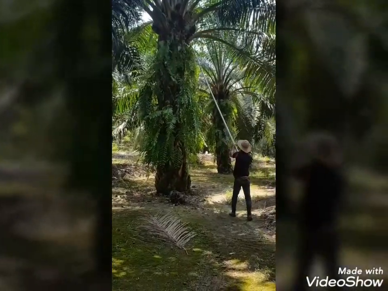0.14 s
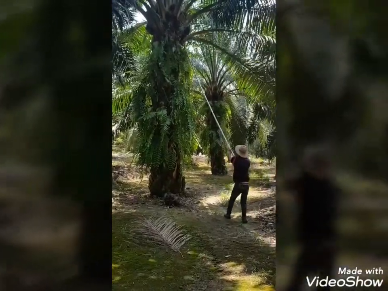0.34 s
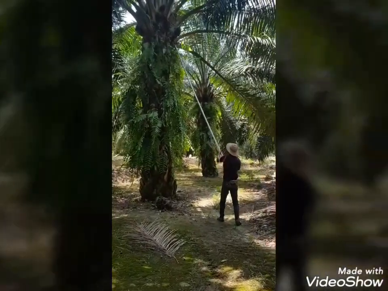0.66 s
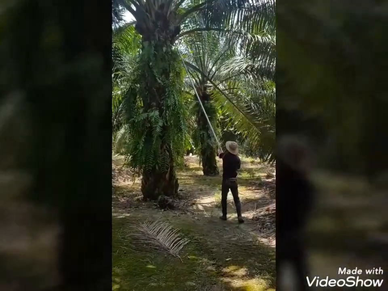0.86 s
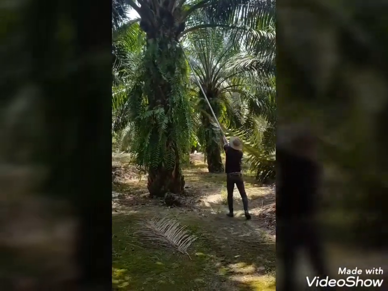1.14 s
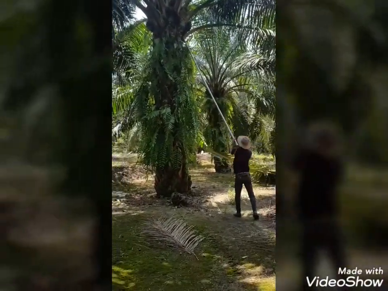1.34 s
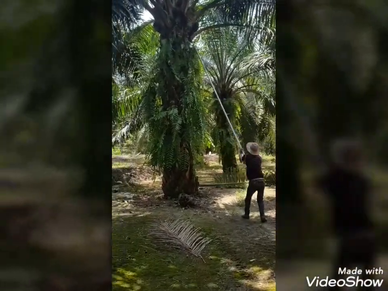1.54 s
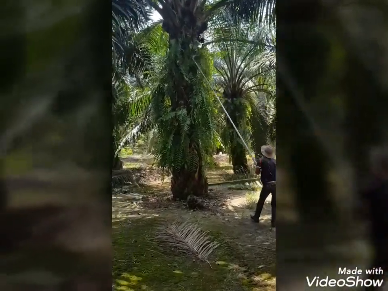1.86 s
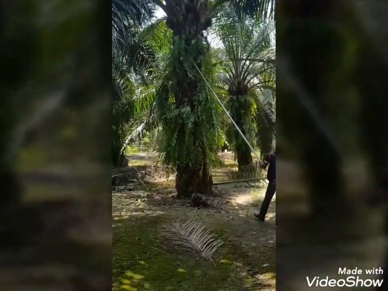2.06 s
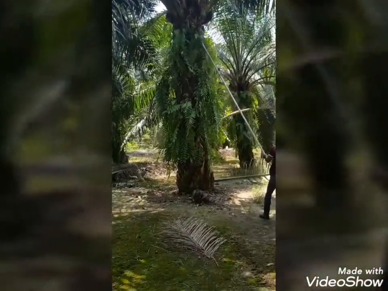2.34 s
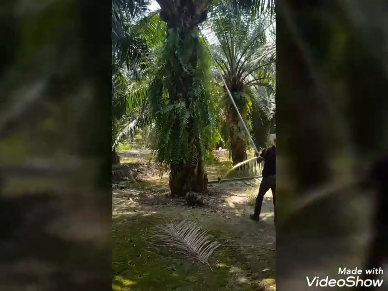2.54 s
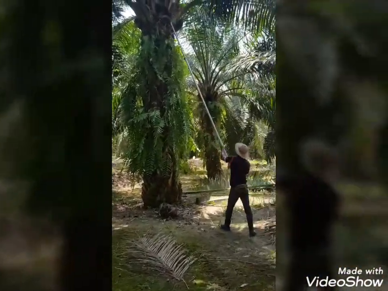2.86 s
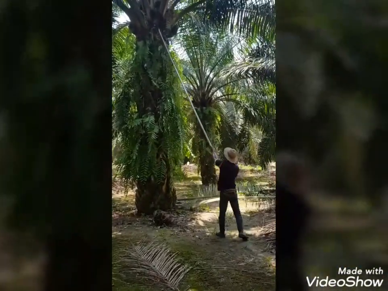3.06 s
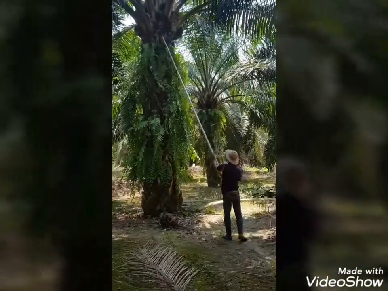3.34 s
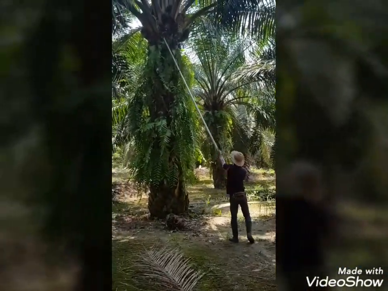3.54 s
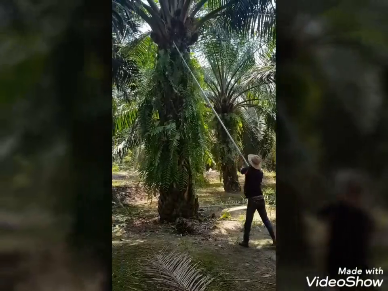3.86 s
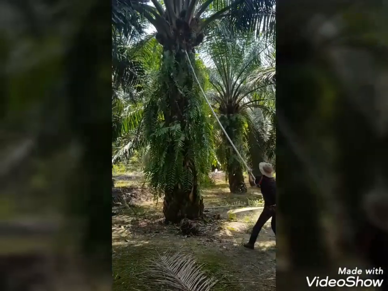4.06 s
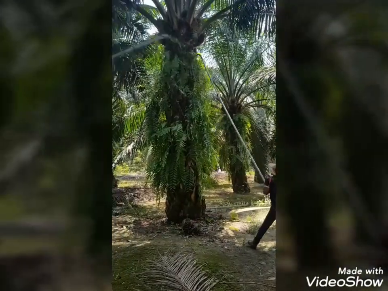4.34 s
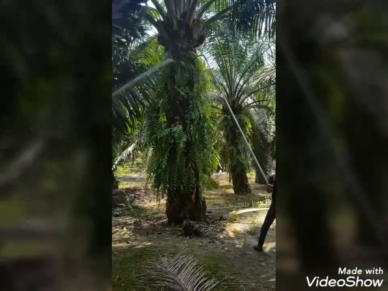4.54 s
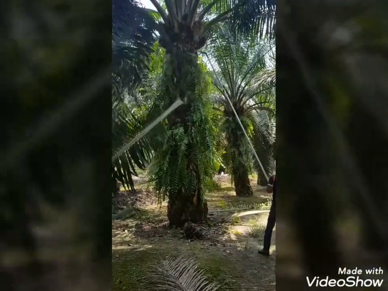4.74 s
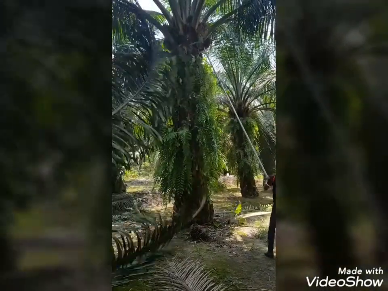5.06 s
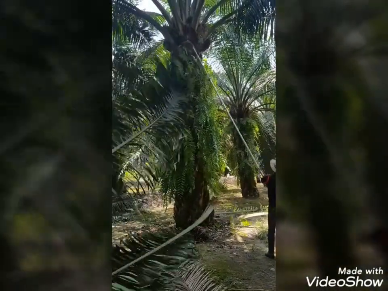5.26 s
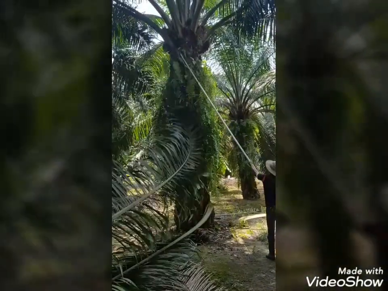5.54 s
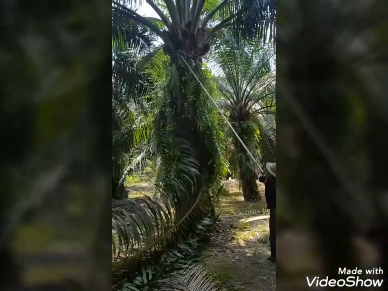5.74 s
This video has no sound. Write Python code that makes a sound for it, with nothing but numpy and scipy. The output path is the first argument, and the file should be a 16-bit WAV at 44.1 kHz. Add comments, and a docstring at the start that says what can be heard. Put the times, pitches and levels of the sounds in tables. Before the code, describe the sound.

Outdoors, a soft low hush and a faint distant engine drone lie under dry palm fronds. From 0 to 0.8 s come light rustles, small ticks and hollow woody knocks, strongest near 0.5 s. Rustling swells from 1.1 s; dull stalk blows at 1.5 and 1.7 s come with a soft thud and a broad leafy swish, fading by 2.4 s. A few ticks and another low thud near 2.7 s lead into a brighter, drier drag until 3.3 s. The engine hum, climbing slightly, peaks around 3.3 s, drops and is gone by 4.1 s. After a near lull, the loudest moment strikes at 4.1 s: a sharp crack, crunch and brief steel ring. Rustle and creaking continue, then heavy crunches, knocks, a thud and crashing leaves at 5.2 to 5.4 s, and a last jerk at 5.9 s. Close stereo, with a short thin tail.

```python
"""Dry palm fronds rustle and tick at once, over a small engine's distant drone and an outdoor hush.
A long-pole blade is cutting them: thick stalks crunch and knock, fibres snap, soft thuds reach the ground.
Coloured ticks and hiss make the leaves; slips and blows ring the modes of stalk and steel; two sines make
the engine. Two microphones a hand apart hear the fronds move from side to side."""
import sys
import numpy as np
from scipy import signal
from scipy.fft import rfft, irfft, next_fast_len
from scipy.io import wavfile
from scipy.ndimage import uniform_filter1d

SR = 44100
rng = np.random.default_rng(int(sys.argv[2]) if len(sys.argv) > 2 else 0)


def transcribe(signal):
    """Save signal, clipped to [-1, 1], as a 16-bit WAV file at the path in sys.argv[1]."""
    frames = np.atleast_2d(signal).T
    limited = np.clip(frames, -1, 1)
    pcm = np.round(limited * 32767).astype(np.int16)
    wavfile.write(sys.argv[1], SR, pcm)


N = 260190  # length in samples

# modes a frond stalk rings with, four of the butt first: (pitch_hz, relative_level_db, t60_s)
STALK_MODES = [(156, -10.5, 0.073), (215, -1.5, 0.024), (276.6, -2.5, 0.028), (349.5, 1, 0.019),
               (446.6, 4.5, 0.013), (821, 8, 0.01), (960, 10, 0.0089), (1160, 12.5, 0.005),
               (1310, 6.5, 0.0053)]
# which part of the frond moves, a gliding curve before chance shifts it:
# (time_s, dullness 0-1 from dry tips to broad blades, weight on the stalk's butt 0-1)
MOVING_PART = [(0.0, 0.43, 0.3), (0.9, 0.28, 0.18), (1.45, 0.47, 0.86), (1.66, 0.28, 0.27),
               (1.9, .35, 0.48), (2.6, 0.4, 0.4), (2.77, 0.54, 0.13), (2.95, 0.28, 0.55), (3.9, 0.37, 0.35),
               (4.12, 0.17, .2), (4.5, 0.64, 0.3), (5.1, .45, 0.38), (5.3, .6, 0.49), (5.9, 0.42, 0.22)]


def gain_of(db):
    """Decibels to amplitude."""
    return 10 ** (np.asarray(db) / 20)


def evened(x):
    """Scales to rms 1."""
    return x / np.sqrt(np.mean(x ** 2) + 1e-20)


def curve(rows, t):
    """All columns of a table, joined by straight lines at times t."""
    s, *columns = np.transpose(rows)
    return [np.interp(t, s, column) for column in columns]


def read(points, hz):
    """A spectrum read on a log-frequency axis."""
    f, value = np.transpose(points)
    return np.interp(np.log(hz + 1), np.log(f + 1), value)


def filtered(x, points):
    """Gives each frequency the gain in dB of the table."""
    size = next_fast_len(N)
    gain = gain_of(read(points, np.fft.rfftfreq(size, 1 / SR)))
    return irfft(rfft(x, size) * gain, size)[:, :N]


def coloured(x, points):
    """Filters x by the spectrum of the table, then scales it to rms 1."""
    return evened(filtered(x, points))


def clicks(per_s, spread_db):
    """Two unrelated trains of ticks of random sign and uneven size."""
    size_db = spread_db * np.minimum(rng.exponential(1, (2, N)), 5)
    sign = rng.choice([-1., 1.], (2, N))
    return gain_of(size_db) * sign * (rng.random((2, N)) < per_s / SR)


def flutter(ms):
    """Slow chance of rms 1: noise smoothed twice over a window of ms."""
    width = round(ms * SR / 1000)
    return evened(uniform_filter1d(uniform_filter1d(rng.standard_normal(N), width), width))


def ring(hz, t60):
    """One dying mode; it takes a moment to start."""
    t = np.arange(4096) / SR
    return (1 - np.exp(-t / 0.0016)) * gain_of(-60 * t / t60) * np.sin(2 * np.pi * hz * t)


def ringing(modes):
    """All modes of an object struck once, energy 1; a slim thing radiates no deep bass."""
    body = sum(gain_of(db) * ring(hz, t60) for hz, db, t60 in modes)
    body = signal.sosfilt(signal.butter(4, 140, "high", fs=SR, output="sos"), body)
    return body / np.linalg.norm(body)


def struck(x, response):
    """Lets both channels of x excite one response."""
    return signal.oaconvolve(x, response[None], axes=1)[:, :N]


def trunks(x):
    """Trunks and crowns scatter a short, thin tail."""
    t = np.arange(8192) / SR
    tail = rng.standard_normal((2, 8192)) * gain_of(-60 * t / 0.25) * (t > .006)
    return x + gain_of(-6.0) * signal.oaconvolve(x, tail / np.linalg.norm(tail[0]), axes=1)[:, :N]


def pair(x, scatter):
    """The right microphone hears the left's sound shifted in time, blended with unrelated scattered sound."""
    # left-right likeness at scatter 1: (pitch_hz, likeness 0-1)
    likeness = [(30, 0.48), (80, 0.92), (250, 0.87), (500, 0.78), (1000, 0.41), (2000, 0.11), (4000, 0.15),
                (12000, 0.064)]
    # how late the sound reaches the left, a gliding curve: (time_s, lag_samples)
    left_lag = [(0, -7.5), (.75, -3), (1.1, 0), (1.75, 3), (2.25, 8.5), (3.25, 3), (3.7, -7.5), (4.4, -6),
                (4.7, 10.5), (5.9, 11.5)]
    # side-to-side balance, a gliding curve: (time_s, left_minus_right_db)
    balance = [(0.0, 0.2), (0.9, -0.7), (3.4, 0), (3.88, -2.5), (4.0, 0.5), (5.9, -0.3)]
    hz, t, z = signal.stft(x, SR, nperseg=1024, noverlap=768)
    same = np.clip(read(likeness, hz), 0, 1)[:, None] ** scatter
    ahead = np.exp(2j * np.pi * hz[:, None] * curve(left_lag, t)[0] / SR)
    z[1] = same * ahead * z[0] + np.sqrt(1 - same ** 2) * z[1]
    z *= gain_of(np.array([.5, -.5])[:, None, None] * curve(balance, t)[0])
    return signal.istft(z, SR, nperseg=1024, noverlap=768)[1][:, :N]


def hush():
    """Far traffic, breeze and insects blend into one bed of coloured noise with a slight flutter."""
    # spectrum of the bed: (pitch_hz, relative_level_db per Hz)
    bed = [(20, -17), (45, -3), (75, 3.5), (150, 2), (250, -8.5), (400, -16.5), (800, -16), (1500, -22),
           (3000, -28), (8000, -21.5), (13000, -32), (15800, -50)]
    level_db = -50.5 + 1.1 * flutter(ms=38)
    return gain_of(level_db) * coloured(rng.standard_normal((2, N)), bed)


def engine(t):
    """Only the firing tone and its octave carry; both throb, and fade as the throttle closes."""
    # the distant engine, gliding curves: (time_s, firing_rate_hz, firing_rms_db, octave_rms_db)
    running = [(0.0, 72, -63, -40), (0.27, 75.44, -53, -62), (0.33, 74.85, -54, -54),
               (0.64, 75.47, -57, -48), (1.16, 77, -50.5, -50.5), (1.3, 78.86, -45.5, -55),
               (1.86, 81, -49, -52), (2.1, 82, -44, -51), (2.45, 83.9, -42.5, -54),
               (2.62, 85.2, -46.5, -55.5), (2.7, 86.5, -44.5, -52), (2.8, 85.5, -52.5, -58),
               (3.32, 89.2, -40.5, -47.5), (3.57, 88.4, -43.5, -62), (3.72, 76.2, -52, -65),
               (3.9, 75, -50, -59), (4.1, 74, -63, -66)]
    hz, first_db, second_db = curve(running, t)
    turn = 2 * np.pi * np.cumsum(hz * (1 + 0.0088 * flutter(ms=34))) / SR
    first = gain_of(first_db + 1.5 * flutter(ms=25)) * np.sin(turn)
    second = gain_of(second_db + 1.5 * flutter(ms=20)) * np.sin(2 * turn)
    fade = np.clip((4.1 - t) / 0.23, 0, 1)
    return np.sqrt(2) * (first + second) * fade  # root 2 turns rms into peak


def thuds(t):
    """Soft ground takes a weight: a few low cycles that swell and fade."""
    # footfalls and landings: (centre_s, level_db, pitch_hz)
    landings = [(0.471, -51, 61), (1.69, -39, 60), (2.72, -38, 47.7), (5.3, -41, 69.3)]
    return sum(gain_of(db) * np.exp(-((t - s) / 0.018) ** 2) * np.sin(2 * np.pi * hz * (t - s))
               for s, db, hz in landings)


def effort(t):
    """Rustle and crunch in dB: slow sway plus jolts that rise fast, hold, and die sooner in wood than leaves."""
    # how hard the fronds sway and drag, gliding curves: (time_s, rustle_db, crunch_above_rustle_db)
    sway = [(0.0, -41.5, -6), (0.38, -48.5, -5), (0.62, -45, -5), (0.79, -44, -0.5), (0.85, -49, -12),
            (0.98, -49, -5.5), (1.13, -36, -10), (1.28, -34.5, -12), (1.54, -37.5, -7), (1.76, -29.5, -7.5),
            (2.2, -38.5, -9.5), (2.36, -43, -7.5), (2.65, -46, -7), (2.78, -33.5, -11), (2.91, -28, -11),
            (3.09, -31.5, -13), (3.17, -30, -7), (3.29, -31, -11), (3.38, -43, -11), (3.58, -50.5, -4.5),
            (4.03, -58, -2), (4.09, -25, -0.5), (4.2, -28.5, -5), (4.37, -34, -3.5), (4.5, -33.5, -3.5),
            (4.57, -37.5, -6), (4.78, -38, -5.5), (4.9, -28.5, -3), (5.04, -30, -7), (5.11, -32.5, -11),
            (5.32, -23.5, 1), (5.39, -21.5, -5.5), (5.52, -32.5, -8.5), (5.9, -29.5, -7.5)]
    # sudden jerks of a frond, full_s being when each reaches its full strength:
    # (full_s, rustle_db, crunch_db, rise_db_per_s, held_s)
    jolts = [(0.0, -34.5, -39.5, 1100, 0.0023), (0.113, -42, -39, 3000, 0.0049),
             (0.248, -42, -59, 4000, 0.011), (0.44, -57, -36, 400, 0.013), (0.459, -36, -36, 500, 0.013),
             (0.542, -34.5, -31, 1500, 0.015), (0.797, -62, -41.5, 800, 0.0034),
             (1.48, -58, -33, 500, 0.016), (1.677, -30, -24, 600, .012), (1.711, -33, -27, 800, 0.013),
             (2.392, -48, -47, 800, .008), (2.526, -39, -42.5, 3000, .004), (2.735, -39, -36, 1500, 0.042),
             (3.632, -38, -37.5, 353, 0.007), (4.078, -34, -28.5, 503, 0.076),
             (4.147, -22.5, -23.5, 800, 0.0072), (5.185, -49, -24, 600, 0.05),
             (5.265, -36, -26, 600, 0.018), (5.315, -23.5, -23.5, 500, 0.015),
             (5.548, -50, -37, 600, 0.0047), (5.877, -20.5, -28.5, 500, .03)]
    rustle_db, above_db = curve(sway, t)
    power = gain_of([rustle_db, rustle_db + above_db]) ** 2
    fall_db_per_s = np.array([[201], [400]])  # leaves, wood
    for full_s, leaf_db, wood_db, rise, held in jolts:
        under_db = rise * np.maximum(full_s - t, 0) + fall_db_per_s * np.maximum(t - full_s - held, 0)
        power += gain_of(np.array([[leaf_db], [wood_db]]) - under_db) ** 2
    return 10 * np.log10(power)


def clumps(per_s, ms):
    """Bunches of leaves catch suddenly and slide free slowly: a level in dB of rms 1."""
    catches = rng.exponential(1, N) * (rng.random(N) < per_s / SR)
    level = signal.lfilter([1], [1, -np.exp(-1000 / (ms * SR))], catches)
    return evened(level - level.mean())


def leaves(colour):
    """Thousands of leaf edges tick past each other, in small clumps, over their blended hiss."""
    edges = evened(clicks(per_s=4000, spread_db=1.0)) + 0.75 * rng.standard_normal((2, N))
    level_db = 0.57 * clumps(per_s=130, ms=5.1) + 0.48 * clumps(per_s=45, ms=5.8)
    return gain_of(level_db) * coloured(edges, colour)


def slaps():
    """Single leaflets slap flat against others: sparse pops of a few cycles, each size with its own pitch."""
    t = np.arange(256) / SR
    total = np.zeros((2, N))
    for hz in np.geomspace(1000, 7000, 12):
        pop = np.sin(2 * np.pi * hz * t) * t * hz * np.exp(-t * hz / 1.1)
        total += struck(clicks(per_s=40, spread_db=4), pop)
    return evened(total)


def leaflets(t, rustle_db):
    """Dry tips and broad blades rustle apart and share the power; slaps ride on top."""
    # spectrum of the dry tips: (pitch_hz, relative_level_db per Hz)
    tips = [(350, -27), (700, -33), (1500, 1), (2800, -1), (4500, 2), (6500, -1), (10000, -3),
            (13200, -8.5), (15800, -31)]
    # spectrum of the broad leaf blades: (pitch_hz, relative_level_db per Hz)
    blades = [(350, -24.5), (700, -2.5), (1000, -10.5), (1600, -5.5), (2450, -1), (4000, -4), (7000, -10.5),
              (12800, -14.5), (15800, -26.5)]
    # dullness also shifts by chance as the frond turns
    dull = np.clip(curve(MOVING_PART, t)[0] + 0.16 * flutter(ms=63), 0, 1)
    rustle = np.sqrt(dull) * leaves(blades) + np.sqrt(1 - dull) * leaves(tips)
    return gain_of(rustle_db) * (rustle + gain_of(-13) * slaps())


def stalks(t, crunch_db):
    """Rubbing and bending send uneven slips into the wood; more weight wakes the low modes of the thick butt."""
    # weight also shifts by chance as the frond turns
    weight = np.clip(curve(MOVING_PART, t)[1] + 0.1 * flutter(ms=34), 0, 1)
    slips = clicks(per_s=900, spread_db=-0.5)
    butt_modes, shaft_modes = np.split(np.array(STALK_MODES), [4])
    butt = evened(struck(slips, ringing(butt_modes)))
    shaft = evened(struck(slips, ringing(shaft_modes)))
    crunch = np.sqrt(weight) * butt + np.sqrt(1 - weight) * shaft
    return gain_of(crunch_db + 2.0 * flutter(ms=18)) * crunch


def ticks():
    """Dry ribs and spines break: a burst with an instant start and a broad colour around its brightest pitch."""
    # sharp breaks: (start_s, peak_db, brightest_hz)
    breaks = [(0.112, -37, 2510), (0.247, -29, 5000), (0.328, -40, 2000), (0.542, -30, 1600),
              (1.845, -26, 2000), (2.525, -26, 4000), (2.69, -29, 1500), (4.052, -40, 1500),
              (4.152, -10, 5500)]
    out, t = np.zeros((2, N + 1024)), np.arange(1024) / SR
    for s, peak_db, hz in breaks:
        band = signal.butter(1, [hz / 2, min(2 * hz, SR / 3)], "band", fs=SR, output="sos")
        burst = rng.standard_normal((2, 1024)) * np.exp(-t / 0.0025)
        tick = signal.sosfilt(band, burst)
        out[:, round(s * SR):][:, :1024] += gain_of(peak_db) * tick / abs(tick).max(1, keepdims=True)
    return out[:, :N]


def blade(t):
    """The steel is shaken for a few milliseconds at each bite and rings on."""
    # modes of blade and pole: (pitch_hz, relative_level_db, t60_s)
    steel = [(1283, 3, 0.11), (1950, -7, 0.038), (2060, 2, 0.053), (2406, 6, 0.19), (3320, -13, .06),
             (4370, -5, .05)]
    # the blade jerks in the wood: (start_s, shake_level_db)
    bites = [(3.172, -36), (4.082, -32), (4.1, -22), (4.147, -19.5), (5.186, -24), (5.322, -25)]
    shakes = sum(gain_of(db) * np.exp(-np.maximum(t - s, 0) / 0.0074) * (t > s) for s, db in bites)
    return struck(shakes * rng.standard_normal((2, N)), ringing(steel))


def knocks():
    """At each blow the struck spot swings a few cycles, the shaken stalk answers, and fibre snaps."""
    # single blows: (start_s, spot_and_stalk_level_db, spot_pitch_hz, fibre_snap_db, length_s)
    hits = [(0.11, -35, 806, -36, 0.0037), (0.246, -36.5, 764, -41, .0025), (0.326, -44, 1670, -43, 0.0032),
            (0.439, -30, 760, -40, .0036), (0.467, -29, 260, -36, .0038), (0.54, -23.5, 762, -40, .0044),
            (0.554, -24.5, 282, -50, .003), (0.641, -37, 715, -44, .002), (0.707, -34, 746, -40, 0.0025),
            (0.747, -39, 950, -43, .0044), (0.799, -34, 720, -44, .0038), (1.144, -30, 192, -46, 0.0021),
            (1.457, -29, 199, -55, .0027), (1.476, -28, 250, -60, 0.0025), (1.486, -18, 723, -61, 0.0018),
            (1.508, -26, 202, -54, .0021), (1.672, -23.5, 1477, -33, .005), (1.682, -22, 189, -43, 0.0035),
            (1.712, -22.5, 1115, -33, 0.0042), (1.726, -23, 936, -41, 0.0019),
            (1.843, -30.5, 885, -33, 0.0029), (2.39, -36.5, 490, -44, 0.0029),
            (2.523, -31, 2640, -40, .002), (2.689, -34.5, 770, -39, 0.0018), (2.752, -28, 758, -35, 0.0042),
            (3.169, -34, 2090, -25, 0.0033), (3.637, -32, 490, -45, 0.0018), (4.05, -46, 820, -39, .003),
            (4.081, -23, 248, -30, 0.0036), (4.084, -18, 774, -30, 0.0032), (4.144, -20, 208, -32, 0.0041),
            (4.147, -8, 1183, -16.5, .0025), (4.46, -33.5, 855, -30.5, 0.0031),
            (4.822, -34, 259, -42, 0.0034), (5.183, -22, 380, -23, 0.0025), (5.211, -18, 480, -22, .0023),
            (5.22, -17, 690, -34, .0025), (5.267, -27, 940, -25, .0032), (5.321, -19.5, 380, -23, 0.0018),
            (5.357, -21, 213, -27, 0.0027), (5.407, -21.5, 263, -26, 0.0018),
            (5.877, -24, 960, -29, 0.0028)]
    # spectrum of splitting fibre: (pitch_hz, relative_level_db per Hz)
    fibre_colour = [(300, -30), (800, -9), (1500, 1), (2400, 5.5), (4000, -23), (9000, -5.5), (15000, -35)]
    stalk_share = 0.3  # of the whole stalk ringing at a blow, 0-1
    out, t = np.zeros((2, N + 8192)), np.arange(2048) / SR
    fibre = coloured(clicks(per_s=7000, spread_db=2), fibre_colour)
    answer = ringing(STALK_MODES)[None]
    for s, level_db, hz, snap_db, length in hits:
        at = round(s * SR)
        blow = t / length * np.exp(1 - t / length)  # swells, then dies
        swing = length + 0.22 / hz  # deep spots are slower to start and stop
        spot = t / swing * np.exp(1 - t / swing) * np.sin(2 * np.pi * (hz * t + rng.random()))
        out[:, at:at + 2048] += gain_of(level_db) * (1 - stalk_share) * spot
        stalk = signal.fftconvolve(blow * rng.standard_normal((2, 2048)), answer, axes=1)
        stalk /= abs(stalk).max(1, keepdims=True)
        out[:, at:at + stalk.shape[1]] += gain_of(level_db) * stalk_share * stalk
        snap = fibre[:, at:at + 2048]
        out[:, at:at + snap.shape[1]] += gain_of(snap_db) * blow[:snap.shape[1]] * snap
    return out[:, :N]


def scene():
    """Blows come from one spot, rustle from a whole frond; engine and thuds arrive alike on both sides."""
    t = np.arange(N) / SR
    rustle_db, crunch_db = effort(t)
    surroundings = hush()
    fronds = leaflets(t, rustle_db) + stalks(t, crunch_db)
    blows = trunks(knocks() + ticks() + blade(t))
    return pair(surroundings + fronds, scatter=1) + pair(blows, scatter=0.5) + engine(t) + thuds(t)


def record(dry):
    """Microphone colour, soft overload, then the band limit of the recorder."""
    # microphone colour: (pitch_hz, gain_db)
    port = [(80, 0.5), (130, -3.5), (6800, 1), (7800, 4), (8800, 0), (14000, 8), (15300, 6)]
    heard = np.tanh(filtered(dry, port))  # the input stage rounds off the highest peaks
    band_limit = signal.firwin(511, 15700, window=("kaiser", 10), fs=SR)  # low-pass edge in Hz
    return signal.oaconvolve(heard, band_limit[None], "same", axes=1)


dry = scene()
out = record(dry)
transcribe(out)
```